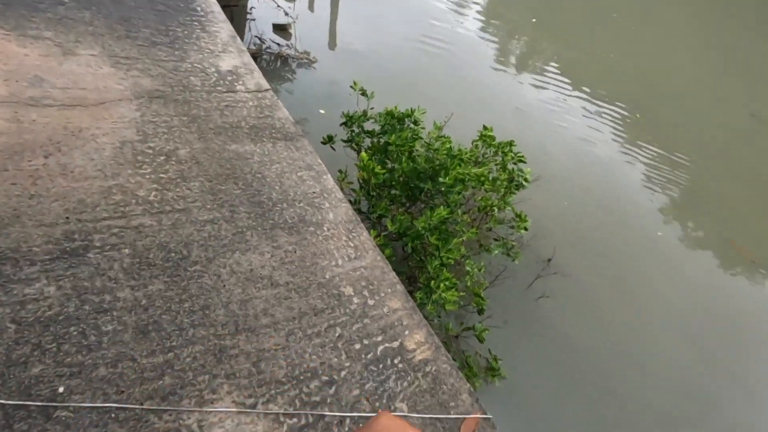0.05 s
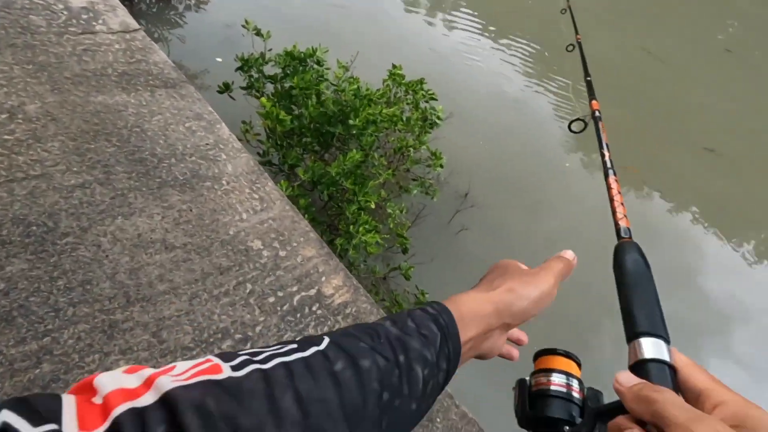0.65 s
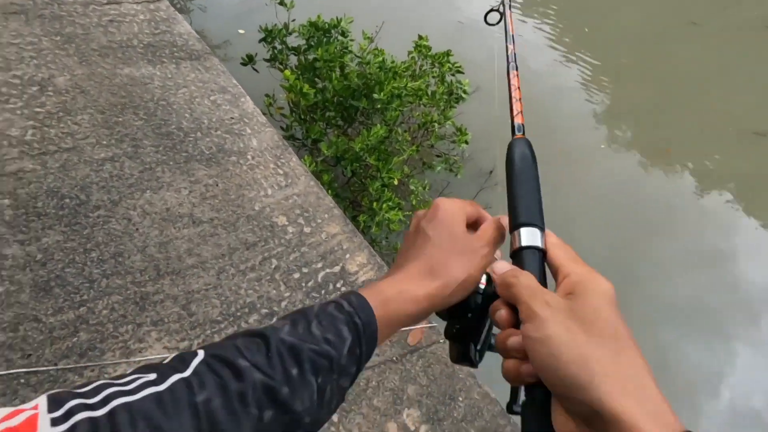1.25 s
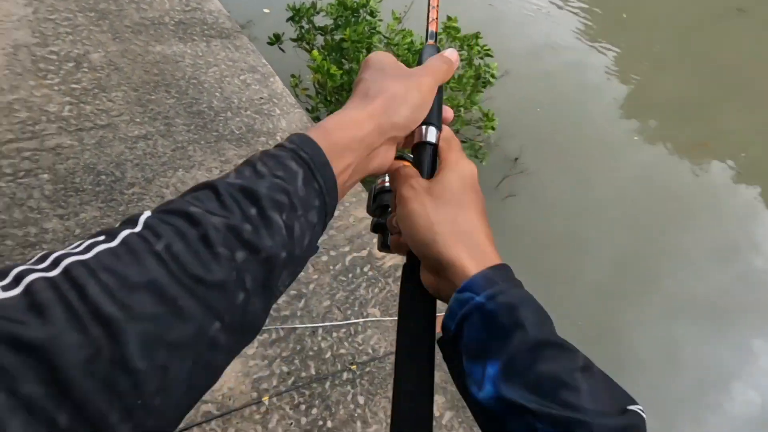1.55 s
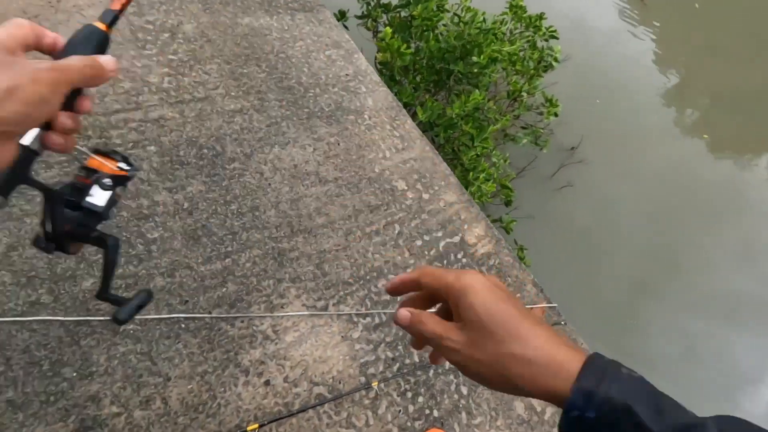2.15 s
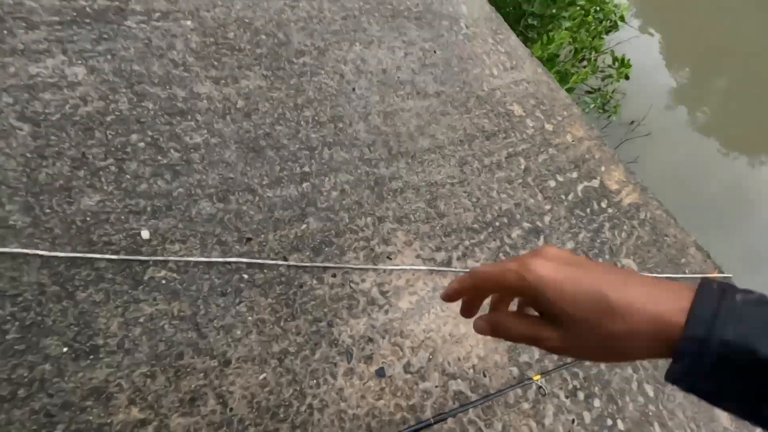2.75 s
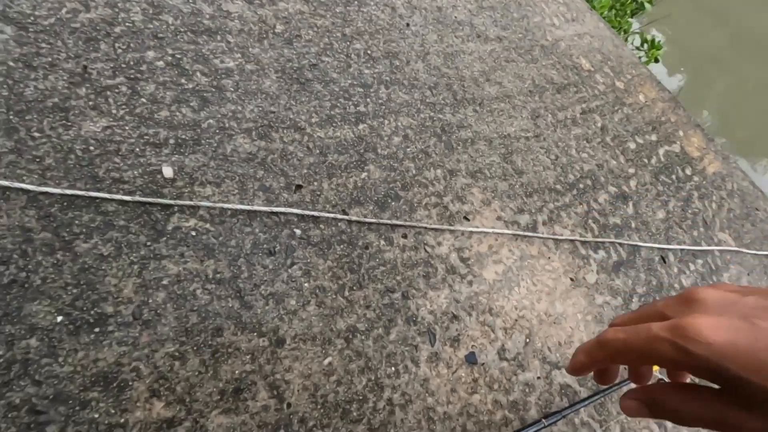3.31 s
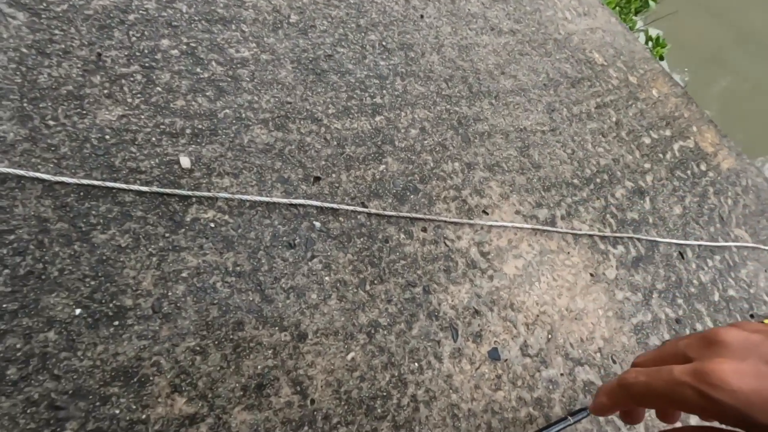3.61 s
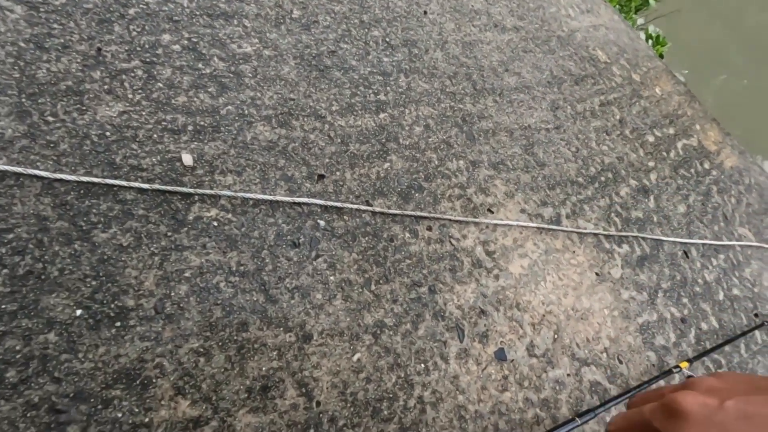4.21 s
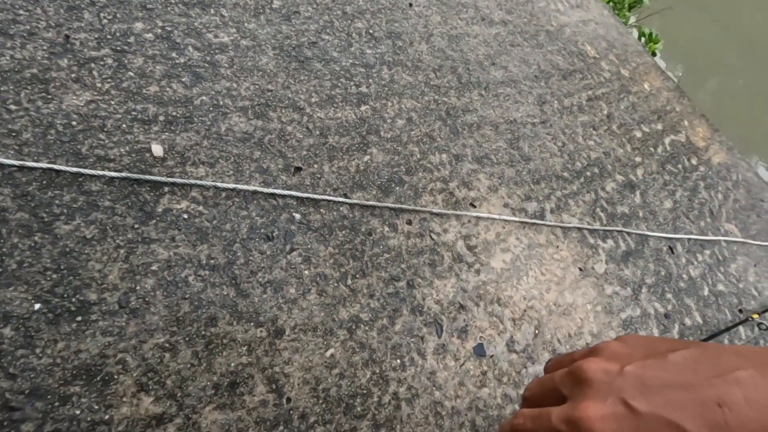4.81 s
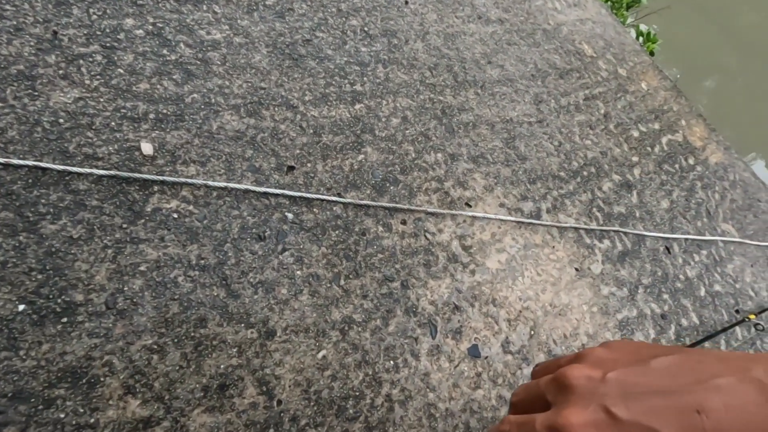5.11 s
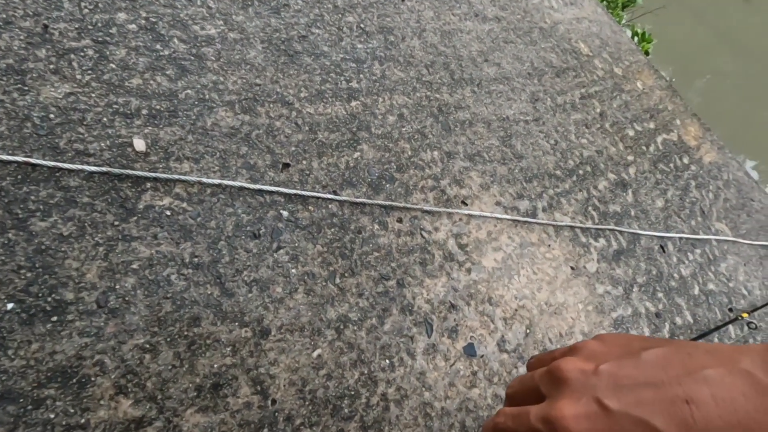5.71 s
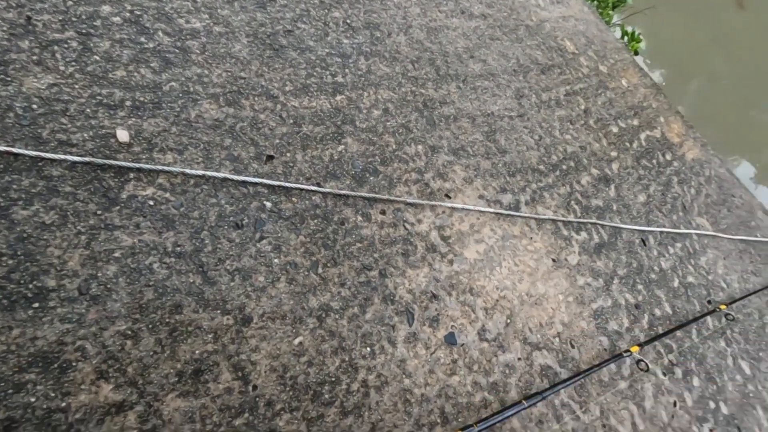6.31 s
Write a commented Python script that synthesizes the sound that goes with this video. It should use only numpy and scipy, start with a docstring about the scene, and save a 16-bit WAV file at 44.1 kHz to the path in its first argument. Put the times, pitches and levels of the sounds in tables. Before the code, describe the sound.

A close outdoor cast ends in a bubbly plop, followed by rod clicks, rustling clothes and two bouts of plastic crackling in light wind.

```python
"""An angler casts from a concrete canal bank: line whirrs off the reel until the bait plops into the
water in a burst of ringing bubbles. Rod and reel tick, sleeves rustle, one step thuds. Then line is
pulled by hand over the concrete, and thin plastic buckles and crackles in two bouts. We hear it close
and dry from a camera on the chest, over light wind, a small bird and a faint insect."""
import sys
import numpy as np
from scipy.fft import rfft, irfft, next_fast_len
from scipy.io import wavfile
from scipy.ndimage import map_coordinates

SR = 44100
rng = np.random.default_rng(int(sys.argv[2]) if len(sys.argv) > 2 else 0)


def store_pcm(level_fs):
    """Save levels as 16-bit WAV."""
    pcm = np.round(np.clip(level_fs, -1, 1) * 32767).astype(np.int16)
    wavfile.write(sys.argv[1], SR, np.atleast_2d(pcm).T)


N = 288855

# Line leaving the reel, its whirr and its airier swish: (frequency [Hz], level [dB])
WHIRR_EQ = [(3000, -18), (4400, -1), (5050, 4), (5600, -4), (7000, -11), (9000, -24), (11000, -17.5),
            (14000, -18), (15800, -30)]
SWISH_EQ = [(3000, -38.5), (6000, -12), (7200, -3), (8300, -0.5), (9400, -4), (10500, -15), (15500, -24)]
# Wind on the microphone: (time [s], level [dB])
WIND_LEVELS = [(0, -45.5), (1, -45.5), (2, -44), (2.5, -41.5), (3.3, -41.5), (4.3, -43), (5.1, -44.5),
               (6.2, -47.5), (6.5, -42.5)]
# Wind rumble, swaying clothes and the open-air bed: (frequency [Hz], level [dB])
RUMBLE_EQ = [(10, -3.5), (25, 0.5), (45, -1), (75, -3.5), (110, -12), (200, -23), (500, -65.5)]
SWAY_EQ = [(60, -16.5), (120, 2), (240, -1), (350, -4), (500, -13.5), (900, -27), (2000, -74)]
AIR_EQ = [(180, -29), (300, 2), (685, -41), (892, -18), (1420, -11.5), (2210, -9.5), (4210, -15),
          (6680, -17.5), (8420, -27.5), (15500, -51)]
# Arm movements: (centre time [s], length [s], rustle level [dB], fizz level [dB])
ARM_STROKES = [(0.052, 0.19, -58.5, -61), (0.705, 0.9, -55, -70), (1.2, 0.11, -53.5, -78),
               (1.483, 0.49, -61, -73.5), (1.869, 0.42, -53, -62), (2.245, .16, -51, -68),
               (2.59, 0.38, -51, -65.5), (3.006, 0.66, -57, -68.5), (4.09, 0.45, -51, -61.5),
               (4.61, 0.38, -52.5, -72), (5.257, 0.34, -51.5, -63), (6.435, 0.16, -53.5, -72)]
# The body of the rustle and the fizz on top: (frequency [Hz], level [dB])
CLOTH_EQ = [(250, -33), (450, 0.5), (1300, 2.5), (2500, -1.5), (3200, -4.5), (6500, -12.5), (9300, -21.5),
            (10800, -23), (15500, -33)]
FIZZ_EQ = [(3000, -26), (5200, 0), (7500, -1.5), (8500, 0), (9250, 1.5), (9900, -17), (10900, -29.5),
           (15500, -20)]
# A small bird's chips: (time [s], level [dB])
BIRD_CHIPS = [(0.017, -45.5), (0.262, -50), (0.487, -43.5), (0.715, -44.5), (0.925, -45.5), (1.135, -47.5),
              (1.352, -52)]
# The rasp in each chip: (frequency [Hz], level [dB])
RASP_EQ = [(1500, -28), (2400, 4), (3300, 6), (4900, 6), (5800, -12.5)]
# Dull bumps of feet and arms:
# (time [s], relative level [dB], start pitch [Hz], settled pitch [Hz], t60 [s], roughness [0-1])
BODY_BUMPS = [(.07, -45, 310, 289.6, 0.31, 0.16), (2.463, -26.5, 870, 790, 0.018, 0.06),
              (2.6559, -8.5, 756, 85, 0.033, 0.04), (2.674, -31.5, 101, 87, 0.487, 0.31),
              (2.672, -38, 262, 198, 0.31, 0.3), (3.625, -39, 414, 393, 0.25, 0.4),
              (3.809, -42.5, 350, 325, 0.3, 0.23), (6.338, -52, 960, 844, 0.27, 0.03)]
# Larger air pockets ringing in the water: (time [s], relative level [dB], start pitch [Hz], t60 [s])
BIG_BUBBLES = [(.799, -23, 527, 0.027), (.812, -23, 316, 0.044), (.832, -17.5, 1071, 0.018),
               (0.8406, -25.5, 715, 0.013), (.857, -25, 344, 0.16), (.891, -30.5, 486, 0.03),
               (.919, -24.5, 735, 0.011), (.951, -33, 1120, .0146), (1.053, -33, 390, 0.02),
               (6.142, -34.5, 900, .0129)]
# The grainy tone of spray and scuffs: (frequency [Hz], level [dB])
GRIT_EQ = [(290, -17), (500, -13.5), (792, -9.5), (1330, -11), (1670, -7.5), (3580, -8), (4310, -13),
           (9790, -30.5), (10800, -47), (15500, -46)]
# An insect in the bushes: (start [s], end [s], pitch [Hz], level [dB])
INSECT_BUZZES = [(1.3, 1.7, 6790, -76), (5.749, 6.317, 6730, -81.5)]
# Clear ticks of line, bail and rod: (time [s], level [dB], brightness [dB/octave])
TACKLE_TICKS = [(1.4742, -49.5, 9), (1.5826, -50.5, 2), (1.837, -44.5, 20), (1.8974, -29.5, 3),
                (2.177, -47, 3.5), (2.2616, -43, 6), (2.5129, -47.5, -10), (3.001, -37.5, -6),
                (3.2429, -43.5, -29), (3.613, -33, 9), (3.686, -42.5, 8.5), (3.7189, -46, 4),
                (3.959, -45.5, 4), (4.0, -47, -24), (4.1477, -43.5, 5)]
# The tone of a tick: (frequency [Hz], level [dB])
TICK_EQ = [(200, -12), (800, 0.5), (1800, 4), (3200, 7.5), (4200, -4.5), (5500, -4), (9000, -12),
           (11000, -26.5), (15500, -33)]
# Scuffs on concrete and cloth: (time [s], level [dB], attack [s], t60 [s], brightness [dB/octave])
SHORT_SCUFFS = [(1.898, -44, .002, 0.14, 5), (2.198, -47, 0.014, 0.37, 4),
                (2.458, -36.5, 0.0035, 0.035, .5), (2.511, -30.5, 0.0011, 0.012, 5),
                (2.62, -37, 0.0017, 0.11, -0.5), (2.663, -34.5, 0.0047, 0.027, -4.5),
                (6.3388, -40.5, 0.00087, 0.13, -3.5), (6.352, -48, 0.022, 0.54, -13)]
# Touches on the rod's metal guides: (time [s], relative level [dB])
GUIDE_TINKS = [(3.6387, -38.5), (3.6866, -41.5), (4.15, -59), (4.187, -38), (4.221, -43), (4.3571, -23),
               (4.3608, -30), (4.383, -36.5)]
# A guide's ringing modes: (frequency [Hz], relative level [dB], t60 [s])
GUIDE_MODES = [(1740, 7, 0.0061), (2840, -10, 0.014), (4600, 3.5, 0.018), (4760, -8, 0.013),
               (6350, -21, 0.023), (7770, -3.5, 0.021), (9180, -8, 0.0108), (13800, -17, 0.0103)]
# Thin plastic buckling under the hand: (time [s], level [dB], brightness [dB/octave])
PLASTIC_SNAPS = [(4.411, -25.5, 13), (4.416, -22.5, -3), (4.4267, -26, -10), (4.455, -23.5, 0.5),
                 (4.4622, -27.5, -1), (4.4845, -28, -4), (4.4973, -21.5, 2), (4.5559, -28, 2.5),
                 (4.562, -23, 1), (4.649, -24, 3), (4.6708, -34, -10), (4.7003, -27, 1.5),
                 (4.7441, -38, -2.5), (4.792, -39.5, -5), (4.802, -37.5, -11), (4.8169, -31, -2),
                 (5.092, -26, 4), (5.1201, -26.5, 5.5), (5.1392, -32, -7), (5.1993, -21.5, 8.5),
                 (5.221, -28.5, -4), (5.252, -27.5, -6), (5.2621, -27.5, 20), (5.2741, -34, 8),
                 (5.2881, -25, 5), (5.2999, -34, 2), (5.315, -24.5, 11), (5.3308, -26, 29),
                 (5.3448, -23.5, 7), (5.351, -27, 15), (5.3678, -22.5, 9), (5.372, -27, 9.5),
                 (5.4149, -27.5, 5.5)]
# The tone of a snap: (frequency [Hz], level [dB])
SNAP_EQ = [(300,-21.5), (900,-11), (1250,-24.5), (1700,-14.5), (2300,-1), (2900,4.5), (3550,-2),
           (3950,-18.5), (4750,1.5), (5550,-0.5), (6900,-19), (8200,-13), (10000,-24.5), (10800,-34.5),
           (15500,-40.5)]
# The plastic shell's resonances: (frequency [Hz], width [Hz], relative level [dB])
SHELL_MODES = [(212, 110, -10), (401, 43, -9.5), (670, 56, -3), (857, 40, -1), (1049, 38, -2.5),
               (1443, 59, -8), (1835, 40, -6), (2160, 83, -6.5), (2314, 52, 0), (2585, 170, -1),
               (2895, 93, 3.5), (3380, 80, -14.5), (3478, 160, -4.5), (4270, 80, -12.5), (4830, 154, -12),
               (5400, 170, -20), (5620, 120, -20), (8550, 2200, -29)]

LAND_S = 0.798  # the bait meets the water


def amp(db):
    """Decibels to gain."""
    return 10 ** (np.asarray(db) / 20)


def unit(x):
    """Scale to rms 1."""
    return x / np.sqrt(np.mean(x ** 2) + 1e-20)


def eq_gain(eq, hz):
    """Gain of an EQ curve, its points joined on a log frequency axis."""
    points_hz, db = np.transpose(eq)
    return amp(np.interp(np.log(hz + 1), np.log(points_hz + 1), db))


def wobble(rate, size=N):
    """Smooth random modulation with `rate` knots a second."""
    knots = rng.standard_normal(int(size * rate / SR) + 4)
    return map_coordinates(knots, [np.arange(size) * rate / SR])


def filtered(x, response):
    """Pass x through a complex frequency response."""
    n = x.shape[-1]
    padded = 2 * next_fast_len(n // 2 + 2048)
    return irfft(rfft(x, padded) * response(np.fft.rfftfreq(padded, 1 / SR)), padded)[..., :n]


def coloured(x, eq):
    """Shape x with an EQ curve, at rms 1."""
    return unit(filtered(x, lambda hz: eq_gain(eq, hz)))


def noise(eq, size=N):
    """Noise shaped by an EQ curve, at rms 1."""
    return coloured(rng.standard_normal(size), eq)


def minimum_phase(gain):
    """A response with these gains and no pre-ring."""
    cepstrum = irfft(np.log(np.maximum(gain, 1e-6)))
    half = len(cepstrum) // 2
    return np.exp(rfft(np.r_[cepstrum[0], 2 * cepstrum[1:half], np.zeros(half)]))


def add(track, s, sound):
    """Mix a sound in at s seconds."""
    part = track[max(round(s * SR), 0):][:len(sound)]
    part += sound[:len(part)]


def tilt(hz, bright):
    """A slope of `bright` dB per octave across the lower treble."""
    return amp(bright * np.log2(np.clip(hz, 2600, 6200) / 4000))


def click(eq, bright, t60):
    """A sudden slip with a trail of tiny ones, carrying the energy of 4 ms at rms 1."""
    t = np.arange(SR // 20) / SR
    slips = 0.39 * rng.standard_normal(len(t)) * amp(-60 * t / t60)
    slips[0] = 1.35
    sound = filtered(slips, lambda hz: minimum_phase(eq_gain(eq, hz) * tilt(hz, bright)))
    return sound / np.sqrt(np.sum(sound ** 2) / (0.004 * SR))


def cast(full_s=0.54, swell_db_per_s=13.5, stop_db_per_s=73, start_hz=8360, end_hz=5040, sink_s=0.62):
    """Coils flick over the spool's lip; the line's whistle in the guides sinks as it slows."""
    t = np.arange(N) / SR
    run_db = -swell_db_per_s * np.maximum(full_s - t, 0) - stop_db_per_s * np.maximum(t - LAND_S, 0)
    flutter = unit(amp(2.5 * wobble(170) + 0.84 * wobble(27.3)))
    whirr = amp(-54.5 + run_db) * noise(WHIRR_EQ)
    swish = amp(-56 + 2.7 * run_db) * noise(SWISH_EQ)
    pitch = end_hz + (start_hz - end_hz) * np.maximum(1 - t / sink_s, 0) ** 1.6
    blur = filtered(rng.standard_normal(N), lambda hz: 1 / (1 + (hz / 560) ** 2))  # makes it breathy
    whistle = amp(-55.5 + 0.99 * run_db) * unit(blur * np.sin(2 * np.pi * np.cumsum(pitch) / SR))
    return flutter * (whirr + swish + whistle)


def wind_and_sway(rub, gust_db=1.5, sway_db=-55):
    """Light air buffets the microphone while clothes sway against the camera as the arms move."""
    wind_db = np.interp(np.arange(N) / SR, *np.transpose(WIND_LEVELS))
    buffet = amp(wind_db + gust_db * wobble(6)) * noise(RUMBLE_EQ)
    sway_gain = amp(sway_db + 3.03 * wobble(20)) * (rub / rub.mean()) ** 0.4
    return buffet + sway_gain * noise(SWAY_EQ)


def open_air(level_db=-67):
    """A faint, steady bed of outdoor air."""
    return amp(level_db) * noise(AIR_EQ)


def arm_envelopes(edge_db=6, idle_rub_db=-68, idle_fizz_db=-79):
    """Each arm movement swells and fades; returns the envelopes for rustle and fizz."""
    t = np.arange(N) / SR
    power = amp([[idle_rub_db], [idle_fizz_db]]) ** 2 * np.ones(N)
    for s, length, rub_db, fizz_db in ARM_STROKES:
        fall_db = edge_db * np.minimum(np.abs(2 * (t - s) / length), 10) ** 2
        power += (amp([[rub_db], [fizz_db]]) * amp(-fall_db)) ** 2
    return np.sqrt(power)


def rustle(rub, fizz_gain, catches_per_s=110):
    """Sleeves and sliding line: fibres rub in clumps and sometimes catch, with a fine fizz on top."""
    clumps = unit(amp(3.2 * wobble(65)))
    catches = 12 * (rng.random(N) < catches_per_s / SR) * rng.uniform(-1, 1, N)
    body = coloured(rng.standard_normal(N) * clumps + catches, CLOTH_EQ)
    fizz = coloured(rng.standard_normal(N) * clumps + 0.5 * catches, FIZZ_EQ)
    return amp(-1) * rub * body + amp(-2) * fizz_gain * fizz


def bird(start_hz=2600, end_hz=2000, slide_s=0.025, octave_db=-6, rasp_db=-5, quaver=0.051):
    """Each chip opens with a rasp and slides down unsteadily, doubled an octave up."""
    out, t = np.zeros(N), np.arange(SR // 20) / SR
    progress = np.minimum(t / slide_s, 1)
    slide_hz = end_hz + (start_hz - end_hz) * (1 - progress) ** 1.53
    swell = np.abs(np.sin(np.pi * progress)) ** 0.66
    rasp_gain = amp(rasp_db - 60 * t / 0.16) * np.minimum(t / 0.00094, 1)
    for s, db in BIRD_CHIPS:
        pitch = slide_hz * (1 + quaver * wobble(926, len(t)))
        phase = 2 * np.pi * np.cumsum(pitch) / SR
        voice = np.sin(phase) + amp(octave_db) * np.sin(2 * phase)
        add(out, s, amp(db) * (swell * voice + rasp_gain * noise(RASP_EQ, len(t))))
    return out


def bumps(attack_s=0.0024, settle_s=0.00282, trim_db=2.5):
    """Soft blows of feet and arms: uneven cycles whose pitch drops as the contact spreads."""
    out, t = np.zeros(N), np.arange(SR // 2) / SR
    for s, db, start_hz, end_hz, t60, roughness in BODY_BUMPS:
        drop_hz = end_hz + (start_hz - end_hz) * np.exp(-t / settle_s)
        pitch = drop_hz * (1 + roughness * wobble(end_hz, len(t)))
        envelope = amp(db + trim_db - 60 * t / t60) * (1 - np.exp(-t / attack_s))
        add(out, s, envelope * np.sin(2 * np.pi * np.cumsum(pitch) / SR))
    return out


def bait_plop(spray_t60=0.39, churn_s=0.13, small_count=14, ring_cycles=11, octaves_per_s=8.77):
    """The bait throws spray and churns up bubbles, which ring and bend upward as they near the surface."""
    out, t = np.zeros(N), np.arange(SR // 3) / SR
    spray = coloured(rng.standard_normal(len(t)) * amp(4 * wobble(592, len(t))), GRIT_EQ)
    add(out, LAND_S, amp(-40 - 60 * t / spray_t60) * np.minimum(t / 0.00069, 1) * spray)
    bubbles = list(BIG_BUBBLES)
    for lateness, octaves in rng.uniform([0, -1], [1, 1], (small_count, 2)):
        hz = 800 * 2 ** octaves
        bubbles.append((LAND_S + churn_s * lateness, -33 - 6 * lateness, hz, ring_cycles / hz))
    for s, db, hz, t60 in bubbles:
        pitch = hz * 2 ** (octaves_per_s * np.minimum(t, 0.05))
        envelope = amp(db - 4 - 60 * t / t60) * (1 - np.exp(-t / 0.0002))
        add(out, s, envelope * np.sin(2 * np.pi * np.cumsum(pitch) / SR))
    return out


def insect(width_hz=130):
    """A thin, high buzz swells and fades."""
    out = np.zeros(N)
    for start, end, hz, db in INSECT_BUZZES:
        t = np.arange(round((end - start) * SR)) / SR
        buzz = unit(wobble(2 * width_hz, len(t)) * np.sin(2 * np.pi * hz * t))
        add(out, start, amp(db) * buzz * np.sin(np.pi * t / (end - start)))
    return out


def tackle(rub, stray_span_s=(1.4, 5.0), stray_count=20):
    """Line, bail and rod tick drily; faint stray ticks fall at random, as strong as the arms move."""
    out = np.zeros(N)
    for s, db, bright in TACKLE_TICKS:
        add(out, s, amp(db) * click(TICK_EQ, bright, t60=0.0095))
    for s in rng.uniform(*stray_span_s, stray_count):
        add(out, s, amp(5) * rub[round(s * SR)] * click(TICK_EQ, bright=2, t60=0.015))
    return out


def scuffs(grain_db=4):
    """Grit catches in grains under each short stroke."""
    out, t = np.zeros(N), np.arange(SR // 2) / SR
    grains = rng.standard_normal(N + SR) * amp(grain_db * wobble(900, N + SR))
    for s, db, attack_s, t60, bright in SHORT_SCUFFS:
        stroke = grains[round(s * SR):][:len(t)]
        grit = coloured(filtered(stroke, lambda hz: tilt(hz, bright)), GRIT_EQ)
        envelope = amp(db - 60 * np.maximum(t - attack_s, 0) / t60) * np.minimum(t / attack_s, 1)
        add(out, s, envelope * grit)
    return out


def rod_guides(trim_db=-6, attack_s=0.00019):
    """A touched metal guide rings briefly while the line chatters against it."""
    out, t = np.zeros(N), np.arange(SR // 10) / SR
    attack = 1 - np.exp(-t / attack_s)
    for s, db in GUIDE_TINKS:
        for hz, mode_db, t60 in GUIDE_MODES:
            chatter_db = 4 * wobble(1100, len(t))
            phase = 2 * np.pi * (hz * t + rng.random()) + 1.05 * wobble(1200, len(t))
            envelope = attack * amp(db + trim_db + mode_db + chatter_db - 60 * t / t60)
            add(out, s, envelope * np.sin(phase))
    return out


def shell_ring(bright, t60=0.086):
    """A dying rattle rings the plastic shell's resonances; rms 1 over the first 10 ms."""
    def resonances(hz):
        return sum((-1) ** k * amp(db) * 1j * hz * width / (centre ** 2 - hz ** 2 + 1j * hz * width)
                   for k, (centre, width, db) in enumerate(SHELL_MODES))

    t = np.arange(SR // 6) / SR
    rattle = rng.standard_normal(len(t)) * amp(-60 * t / t60)
    ring = filtered(rattle, lambda hz: resonances(hz) * tilt(hz, bright))
    return ring / np.std(ring[:SR // 100])


def plastic_crackle(lead_s=0.00135, max_gap_s=0.009, slip_loss_db=12.5, dulling=2.5):
    """Thin plastic gives a little, cracks sharply, then rings while weaker creases slip."""
    out = np.zeros(N)
    for s, db, bright in PLASTIC_SNAPS:
        ring = shell_ring(0.34 * bright)
        crease_s = s - 0.009 * rng.uniform(0.44, 1.5)  # a faint crease goes first
        add(out, crease_s, amp(db - 26) * click(SNAP_EQ, bright - dulling, t60=0.052))
        add(out, s - lead_s, amp(db - 15) * click(SNAP_EQ, bright, t60=0.033))  # the give
        add(out, s, amp(db) * click(SNAP_EQ, bright, t60=0.0127))  # the crack
        add(out, s, amp(db - 10 - 0.339 * bright) * ring)  # dull snaps shake the shell more
        for k, delay in enumerate(np.cumsum(max_gap_s * rng.uniform(0.25, 1, 2)), 1):
            slip = click(SNAP_EQ, bright - k * dulling, t60=0.0075)
            add(out, s + delay, amp(db - k * slip_loss_db) * slip)
    return out


def scene():
    """Open air gives no echo; the same dry mix reaches both microphone ports."""
    rub, fizz_gain = arm_envelopes()
    gear = cast() + plastic_crackle() + tackle(rub) + rod_guides()
    movement = scuffs() + bumps() + rustle(rub, fizz_gain)
    ambience = bird() + insect() + wind_and_sway(rub) + open_air()
    mono = gear + movement + bait_plop() + ambience
    return np.array([mono, mono])


def record(dry, split_hz=10500, right_db=-4, hiss_db=-92, cutoff_hz=16000):
    """Two microphone ports, mono except in the top treble, each with a faint hiss under a high cut."""
    def far_port(hz):
        phase_bend = np.exp(1j * np.sin(2 * np.pi * hz / 700))  # caused by the camera body
        return np.where(hz > split_hz, amp(right_db) * phase_bend, 1)

    ports = np.array([dry[0], filtered(dry[1], far_port)])
    hiss = amp(hiss_db) * rng.standard_normal((2, N))
    return filtered(ports + hiss, lambda hz: hz < cutoff_hz)


dry = scene()
out = record(dry)
store_pcm(out)
```